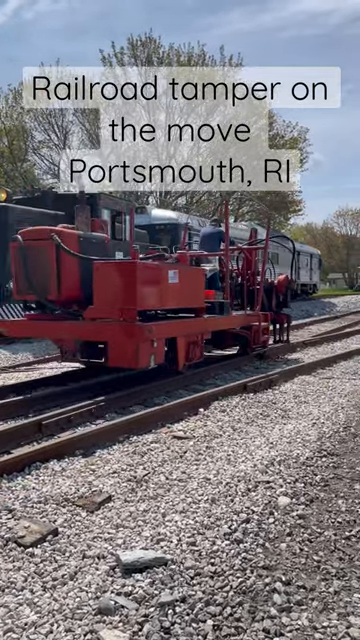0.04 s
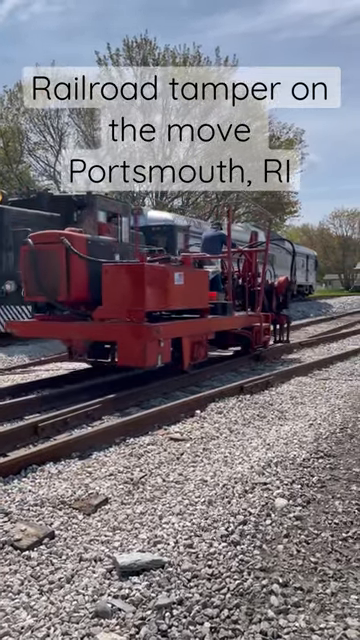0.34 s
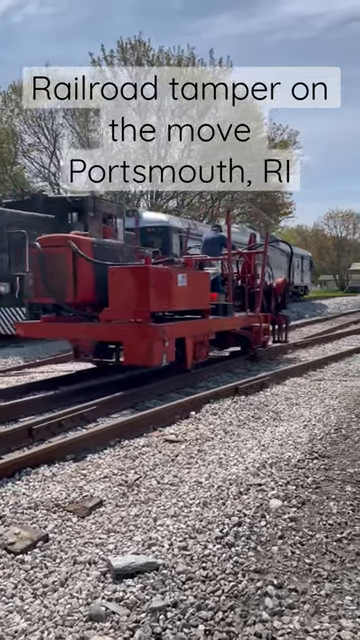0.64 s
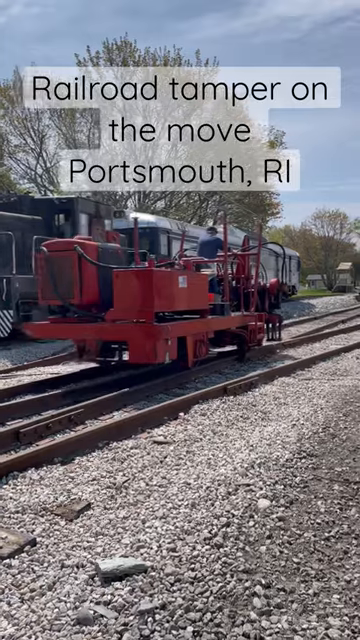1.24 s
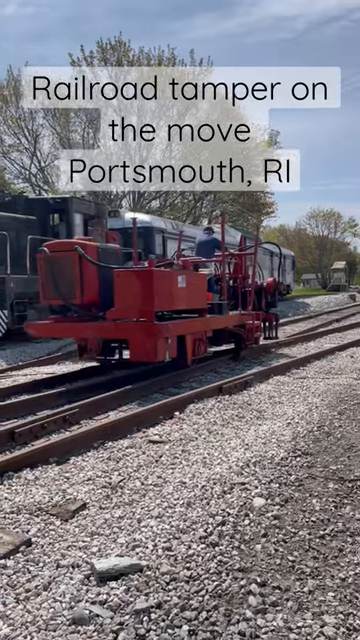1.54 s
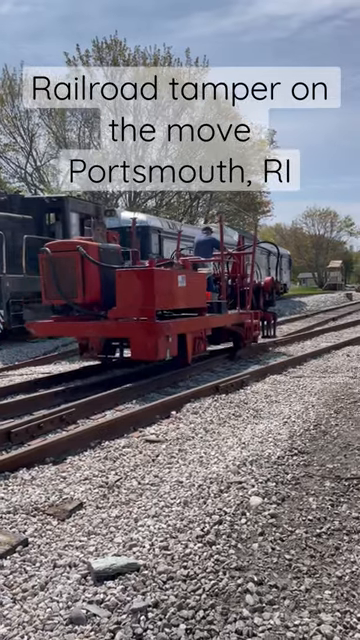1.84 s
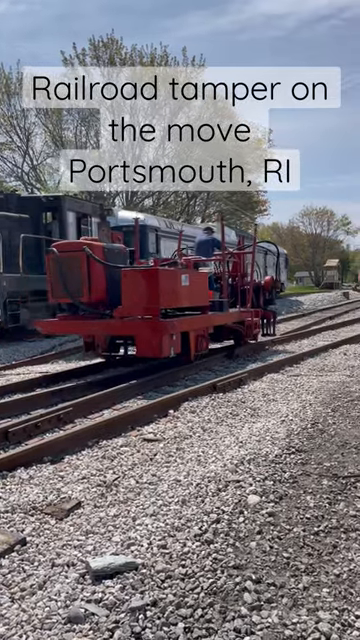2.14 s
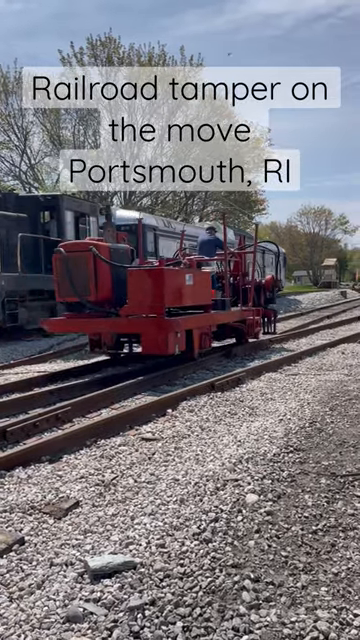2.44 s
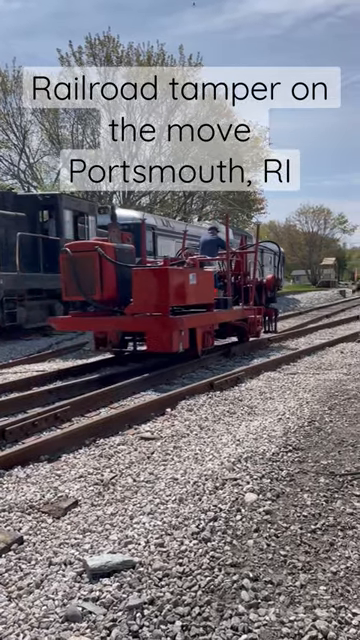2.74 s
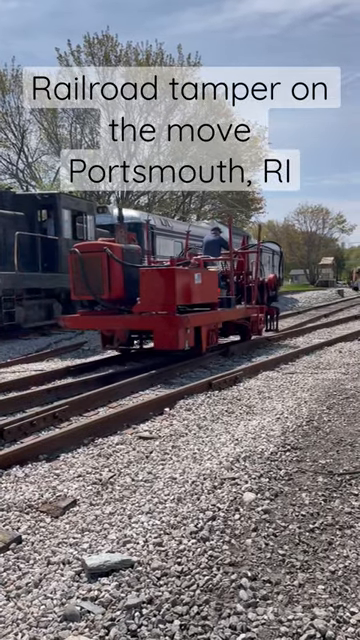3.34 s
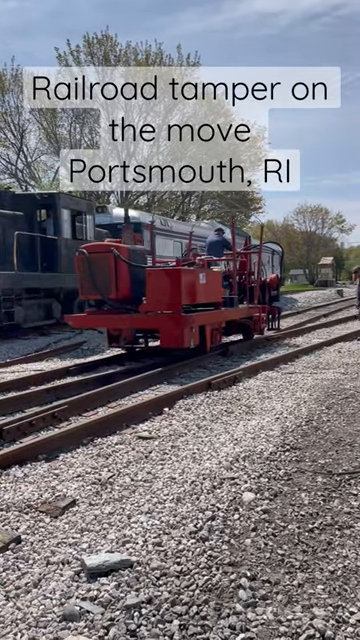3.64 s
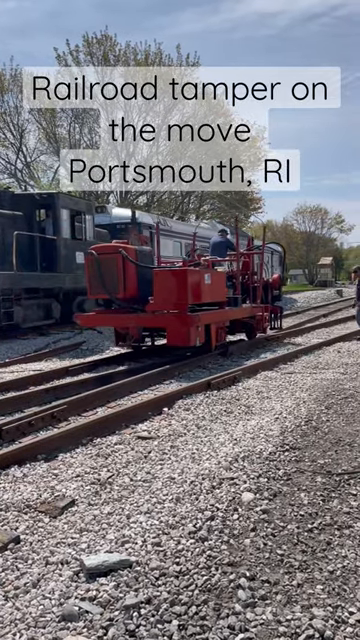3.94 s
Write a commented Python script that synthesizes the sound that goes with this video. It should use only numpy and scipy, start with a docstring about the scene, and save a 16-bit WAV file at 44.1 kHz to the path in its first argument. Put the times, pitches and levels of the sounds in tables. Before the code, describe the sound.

A rail maintenance machine's diesel drones steadily as it rolls slowly, hissing in brief, regular spits.

```python
"""A diesel drones at high, slightly hunting revs: a track maintenance machine rolling slowly over ballast.
Its tones are orders, multiples of the crank speed. The exhaust is loudest on the twelfth, over a buzz of
other orders, clatter in every turn and a broad rush. Panels resonate as the orders sweep through them.
Short hissing spits, probably compressed air, come every half second or so; a wheel squeals thinly twice,
the frame clanks once, and a big diesel seems to idle behind."""
import sys
import numpy as np
from scipy import signal
from scipy.fft import rfft, irfft
from scipy.io import wavfile
from scipy.ndimage import uniform_filter1d

SR = 44100
rng = np.random.default_rng(int(sys.argv[2]) if len(sys.argv) > 2 else 0)


def to_wav(s):
    """Save 16-bit WAV."""
    ch = np.atleast_2d(s).T  # columns
    pcm = np.round(np.clip(ch, -1, 1) * 32767)  # PCM
    wavfile.write(sys.argv[1], SR, pcm.astype(np.int16))


N = 176400
T = np.arange(N) / SR
HZ = np.fft.rfftfreq(N, 1 / SR)


def amp(db):
    """Amplitude grows tenfold for every 20 dB."""
    return 10 ** (np.asarray(db) / 20)


def unit_rms(x):
    """Normalisation to a mean power of one."""
    return x / np.sqrt(np.mean(abs(x) ** 2) + 1e-20)


def curve(points):
    """Linear interpolation of (time, value) points at every sample."""
    return np.interp(T, *np.transpose(points))


def spectrum_at(points, hz):
    """Interpolation of (frequency, value) points on a logarithmic frequency axis."""
    f, value = np.transpose(points)
    return np.interp(np.log(hz + 1), np.log(f + 1), value)


def drift(rate_hz):
    """Low-passed noise: a random movement of unit size, up to about the given rate."""
    count, control_hz = 2048, 256
    lowpass = np.exp(-(np.fft.rfftfreq(count, 1 / control_hz) / rate_hz) ** 2)
    slow = unit_rms(irfft(rfft(rng.standard_normal(count)) * lowpass))
    return np.interp(T, np.arange(count) / control_hz, slow)


def partial(turns, order, wander, rate_hz):
    """Interference with shifting reflections makes a tone wander in amplitude and phase."""
    angle = 2 * np.pi * (order * turns + rng.random())
    in_phase = (1 + wander * drift(rate_hz)) * np.cos(angle)
    quadrature = wander * drift(rate_hz) * np.sin(angle)
    return (in_phase + quadrature) / np.sqrt(.5 + wander ** 2)


def ringing(modes, age):
    """Free vibration: each mode is an exponentially damped sinusoid."""
    return sum(amp(db - 60 * age / t60) * np.sin(2 * np.pi * hz * age) for hz, db, t60 in modes)


def resonance_db(resonances, hz):
    """Each resonance lifts the frequencies near its centre in a bell-shaped peak."""
    return sum(db / (1 + (2 * (hz - centre) / width) ** 2) for centre, width, db in resonances)


# Each row: frequency in Hz, correlation between the two microphone ports from 0 to 1.
COHERENCE = [(60, .998), (300, .985), (750, .85), (1300, .95), (1800, .985), (2400, .88), (3400, .62),
             (4500, .72), (5500, .85), (6300, .75), (7300, .98), (8200, .98), (9400, .7), (10400, .98),
             (11700, .98), (12600, .6), (14200, .97), (15800, .65)]


def noise(spectrum, envelope):
    """Partial coherence: coloured noise has a part common to both ports and a part in antiphase."""
    common, opposed = rfft(rng.standard_normal((2, N)) * envelope)
    coherence = np.clip(spectrum_at(COHERENCE, HZ), -1, 1)
    mid = common * np.sqrt((1 + coherence) / 2)
    side = opposed * np.sqrt((1 - coherence) / 2)
    colour = amp(spectrum_at(spectrum, HZ))
    return irfft(np.array([mid + side, mid - side]) * colour, N) * np.sqrt(SR / 2)


# Each row: frequency in Hz, level in dB.
IDLE_TONES = [(54.8, -58), (69.3, -40), (73.1, -39.5), (78.3, -42.5), (85.3, -50), (91.3, -46), (97.6, -45),
              (103.6, -48)]


def idling_diesel():
    """Beating: closely spaced low tones add up to a lumpy rumble."""
    return sum(amp(db) * partial(hz * T, order=1, wander=0.18, rate_hz=1.9) for hz, db in IDLE_TONES)


# Each row: frequency in Hz, spectral density in dB.
RUSH_SPECTRUM = [(20, -72), (40, -73), (60, -58), (110, -62), (170, -64), (300, -69), (480, -61),
                 (750, -63.5), (1200, -67), (2000, -71.5), (2550, -71), (3200, -75), (4200, -76.5),
                 (5500, -77), (7000, -87.5), (9000, -84), (11000, -93.5), (15500, -103)]
# Each row: frequency in Hz, depth of the drifting patches in dB.
PATCH_DEPTH = [(300, 3), (2500, 3), (4500, 2.7)]
# Each row: centre in Hz, width in Hz, lift in dB.
METAL_RESONANCES = [(2509, 70, 2.5), (4170, 110, 3), (5720, 90, 2.5)]


def rush():
    """Broadband noise of fan, wheels and air drifts in patches and excites resonances in metal parts."""
    hz, _, spectrogram = signal.stft(noise(RUSH_SPECTRUM, envelope=0.99), SR, nperseg=2048)
    patches = uniform_filter1d(rng.standard_normal(spectrogram.shape[1:]), size=4, axis=0)
    patches = unit_rms(uniform_filter1d(patches, size=9, axis=1))  # smooth in frequency, then time
    gain_db = spectrum_at(PATCH_DEPTH, hz)[:, None] * patches
    gain_db += resonance_db(METAL_RESONANCES, hz)[:, None]
    return signal.istft(spectrogram * amp(gain_db), nperseg=2048)[1][:, :N]


# Each row: frequency in Hz, relative level in dB, time to fall 60 dB in seconds.
FRAME_MODES = [(510, 0, .6)]


def clank(start_s=1.3, rise_s=.02, level_db=-29):
    """Impact excitation: jolted once, the frame rings dully in one low mode."""
    age = np.maximum(T - start_s, 0)
    return amp(level_db) * np.minimum(age / rise_s, 1) * ringing(FRAME_MODES, age)


# Each row: start in seconds, length in seconds, level in dB.
WHEEL_SQUEALS = [(.61, .28, -43), (1.67, .24, -43)]


def squeals(pitch_hz=2509, fade_s=0.054):
    """Friction, probably against the rail, makes one wheel mode sing with a slightly rough tone."""
    envelope = np.zeros(N)
    for start, length, db in WHEEL_SQUEALS:
        nearest_end_s = np.minimum(T - start, start + length - T)
        envelope += amp(db) * np.clip(nearest_end_s / fade_s, 0, 1)
    return envelope * partial(pitch_hz * T, order=1, wander=.18, rate_hz=35)


# Each row: start in seconds, gain of the hiss in dB, gain of its lower body in dB.
AIR_SPITS = [(0.492, -6, -5), (1.042, -1.5, -2.5), (1.524, -11, -11), (1.902, -7.5, -6), (2.265, -3, -5),
             (2.769, -11.5, -4), (3.128, -6, -15), (3.513, -7.5, -11), (3.894, -0.5, -2.5)]
# Each row: frequency in Hz, spectral density in dB.
HISS_SPECTRUM = [(3000, -87), (5500, -70), (8000, -69.5), (11000, -71.5), (15500, -73.5)]
BODY_SPECTRUM = [(2000, -82.5), (3700, -62.5), (5000, -63), (6500, -75.5), (9000, -80)]
# A faint, longer leak. Each row: time in seconds, gain of the hiss in dB.
LEAK_GAIN = [(1.12, -51), (1.26, -20), (1.5, -22), (1.68, -46)]
# Each row: frequency in Hz, relative level in dB, time to fall 60 dB in seconds.
PIPE_MODES = [(4350, -53.5, .07), (5010, -50.5, 0.063), (5500, -53, .06)]


def spits(rise_s=0.0039, fall_s=0.0083, tail_s=0.048, tail_db=-21.5, pipe_db=-10):
    """Jet noise: each spit of air swells quickly, dies with a faint tail and rings the pipe's modes."""
    hiss, body = amp(curve(LEAK_GAIN)), np.zeros(N)
    for start, hiss_db, body_db in AIR_SPITS:
        age = np.maximum(T - start - rise_s, 0)
        fall = np.exp(-age / fall_s) + amp(tail_db) * np.exp(-age / tail_s)
        envelope = np.clip((T - start) / rise_s, 0, 1) * fall
        hiss += amp(hiss_db) * envelope
        body += amp(body_db) * envelope
    pipe_response = ringing(PIPE_MODES, T[:SR // 4])
    pipe = signal.fftconvolve(body * rng.standard_normal(N), pipe_response)[:N]
    return noise(HISS_SPECTRUM, hiss) + noise(BODY_SPECTRUM, body) + amp(pipe_db) * pipe


# Each row: crank angle as a fraction of a turn, relative level in dB.
CRANK_KNOCKS = [(0.122, -7), (0.859, -6)]
# Each row: frequency in Hz, spectral density in dB.
CLATTER_SPECTRUM = [(300, -79.5), (1000, -71.5), (2500, -83), (3300, -81.5), (4300, -82.5), (6000, -84),
                    (9000, -104), (11000, -93), (15500, -100)]


def clatter(turns, decay_turns=0.23, spread_db=2):
    """Periodic impacts: valves and injectors make noise bursts at set crank angles, uneven in strength."""
    envelope = np.zeros(N)
    for angle, db in CRANK_KNOCKS:
        age_turns = turns + 1 - angle
        strength_by_turn = amp(db + spread_db * rng.standard_normal(size=256))
        envelope += strength_by_turn[age_turns.astype(int)] * np.exp(-(age_turns % 1) / decay_turns)
    return noise(CLATTER_SPECTRUM, unit_rms(envelope))


# Each row: centre in Hz, width in Hz, lift in dB.
PANEL_RESONANCES = [(612, 12, 13), (789, 26, 6), (991, 12, 10), (1061, 8.7, 5.5), (1489, 31, 8),
                    (1505, 26, -0.5), (1859, 36, 8.5)]


def panel_gain(hz):
    """Forced vibration: a gliding order swells as it crosses a panel's natural frequency."""
    return np.interp(T, T[::200], amp(resonance_db(PANEL_RESONANCES, hz[::200])))


# Each row: frequency in Hz, level of an order there in dB.
BUZZ_SPECTRUM = [(700, -45.5), (900, -48.5), (1100, -48.5), (1300, -48.5), (1500, -50.5), (1680, -53),
                 (1880, -54.5), (2150, -57), (2330, -54.5), (2600, -56), (3000, -65.5), (4500, -68.5)]
# Each row: time in seconds, gain in dB.
BUZZ_GAIN = [(0, 0), (.45, 3), (.8, 1.5), (1.3, 0.5), (1.9, 0), (2.4, 0), (3.1, -1.5), (3.6, .5), (4, 1.5)]


def buzz(turns, speed, stereo_width=.15, wander_hz=1.4, flutter=0.05):
    """A harmonic series of high orders drives the panels and differs a little at each port."""
    out = np.zeros((2, N))
    for order in np.setdiff1d(np.arange(19, 112), [20, 25, 30]):  # these three have their own levels
        level = amp(spectrum_at(BUZZ_SPECTRUM, order * speed.mean())) * panel_gain(order * speed)
        mid = partial(turns, order, wander=0.33, rate_hz=wander_hz)
        side = stereo_width * drift(wander_hz) * np.cos(2 * np.pi * (order * turns + rng.random()))
        out += level * np.array([mid + side, mid - side])
    return out * amp(curve(BUZZ_GAIN)) * (1 + flutter * drift(rate_hz=40))


# Each row: time in seconds, level in dB.
LOW_WHINE_LEVEL = [(0, -46), (.8, -58), (1.35, -42), (1.75, -60), (2.3, -37), (3.35, -37.5), (3.75, -44),
                   (4, -35)]
HIGH_WHINE_LEVEL = [(0, -41.5), (.55, -33), (1.15, -42), (1.7, -38), (2, -41), (2.3, -34), (2.7, -38.5),
                    (3.3, -38.5), (3.6, -45), (4, -39)]


def whines(turns):
    """Slow amplitude modulation: two orders near 1 kHz swell and fade."""
    low = amp(curve(LOW_WHINE_LEVEL)) * partial(turns, order=25, wander=0.14, rate_hz=5.8)
    high = amp(curve(HIGH_WHINE_LEVEL)) * partial(turns, order=30, wander=0.14, rate_hz=7.5)
    return low + high


# Each row: time in seconds, level of the fundamental in dB.
GROWL_LEVEL = [(0.0, -41), (0.6, -30), (1.45, -34), (1.76, -42), (1.86, -31.5), (2.31, -29.5),
               (2.88, -40.5), (3.23, -31), (3.63, -28), (3.98, -50), (4.0, -44)]
# Each row: multiple of the blade tone, level in dB.
BLADE_OVERTONES = [(2, -44), (3, -48)]


def fan(turns, blades_per_turn=4.955):
    """A growl, probably the belt-driven fan's blade-passing tone, slips against the engine's orders."""
    passes = blades_per_turn * turns
    growl = amp(curve(GROWL_LEVEL)) * partial(passes, order=1, wander=0.056, rate_hz=2.0)
    return growl + sum(amp(db) * partial(passes, round(multiple), wander=1.0, rate_hz=1.7)
                       for multiple, db in BLADE_OVERTONES)


# Each row: multiple of the crank speed, level in dB.
ENGINE_ORDERS = [(2, -45.5), (4, -49.5), (7, -49.5), (8, -49.5), (14, -42), (15, -49), (16, -42.5),
                 (20, -46)]


def steady_orders(turns, speed):
    """Steadier harmonics of the crank speed, lifted wherever they meet a panel resonance."""
    out = np.zeros(N)
    for order, db in ENGINE_ORDERS:
        level = amp(db) * panel_gain(round(order) * speed)
        out += level * partial(turns, round(order), wander=0.29, rate_hz=1.9)
    return out


# Each row: time in seconds, level in dB.
BASS_LEVEL = [(0, -31.5), (.3, -35), (.75, -28.5), (1.2, -37.5), (1.7, -32), (2.1, -34), (2.5, -29),
              (3.1, -43.5), (3.45, -33.5), (4, -31)]
HUM_LEVEL = [(0, -26.5), (.5, -29.3), (.75, -29.3), (1.15, -31.3), (1.65, -30.3), (2.0, -35), (2.2, -33.7),
             (2.4, -38), (2.9, -40), (3.2, -37), (3.5, -30.3), (3.75, -31.5), (4, -27)]
NASAL_LEVEL = [(0, -26), (.35, -23.5), (.7, -34), (1.0, -31), (1.35, -28.5), (1.7, -37), (1.92, -31.5),
               (2.4, -36.5), (2.8, -40.5), (3.7, -37), (3.95, -27)]
NASAL_NEIGHBOUR_LEVEL = [(0, -28), (.45, -27.5), (.75, -48), (1.9, -40), (2.7, -51.5), (3.3, -45),
                         (3.8, -32.5), (4, -31)]


def exhaust(turns, fifth_db=-3.5):
    """Periodic exhaust flow radiates harmonics: a bass, a hum with its fifth, and a nasal pair."""
    bass = amp(curve(BASS_LEVEL)) * partial(turns, order=3, wander=0.29, rate_hz=1.9)
    hum = partial(turns, order=6, wander=0.024, rate_hz=10.0)
    fifth = amp(fifth_db) * partial(turns, order=9, wander=0.14, rate_hz=7.9)
    nasal = amp(curve(NASAL_LEVEL)) * partial(turns, order=18, wander=0.16, rate_hz=6)
    neighbour = amp(curve(NASAL_NEIGHBOUR_LEVEL)) * partial(turns, order=17, wander=0.18, rate_hz=2.2)
    return bass + amp(curve(HUM_LEVEL)) * (hum + fifth) + nasal + neighbour


# Each row: time in seconds, level in dB.
DRONE_LEVEL = [(0.0, -20.5), (0.38, -19.5), (0.62, -15), (1.22, -18.5), (1.48, -21), (1.63, -20),
               (1.76, -23.5), (1.95, -18.5), (2.07, -20.5), (2.53, -17.5), (3.12, -18), (3.32, -17.5),
               (3.43, -23), (3.71, -24), (3.95, -21.5), (4.0, -23)]
# Each row: time in seconds, left minus right in dB on top of the ports' own balance.
DRONE_PAN = [(0, -0.29), (.7, -0.36), (1.25, 1.3), (1.8, -0.59), (2.3, -.7), (4, -.5)]


def drone(turns, order=12, throb_db=-31.5):
    """Amplitude modulation makes the loudest exhaust harmonic throb once a turn."""
    envelope = amp(curve(DRONE_LEVEL)) + amp(throb_db) * np.cos(2 * np.pi * turns)
    lean = amp(curve(DRONE_PAN) / 2)
    return np.array([lean, 1 / lean]) * np.sqrt(2) * envelope * np.cos(2 * np.pi * order * turns)


# Each row: time in seconds, crank speed in turns per second.
CRANK_SPEED = [(0, 37.65), (0.28, 37.75), (0.6, 38.89), (0.85, 39.36), (1.15, 39.58), (1.65, 39.54),
               (1.83, 38.52), (2.03, 37.87), (2.14, 37.77), (2.35, 38.66), (2.6, 39.2), (3.1, 39.76),
               (3.2, 39.63), (3.42, 38.3), (3.62, 37.62), (4, 37.37)]
# Each row: time in seconds, gain of the rush, clatter and steady orders in dB.
MACHINE_BED_GAIN = [(0, 0.5), (.5, 0), (1.1, 0), (1.7, -0.5), (2.25, -0.7), (2.8, -1), (3.3, -2),
                    (3.7, -1.5), (4, -1.5)]


def scene():
    """Superposition: the engine's layers share one crank phase; the other sources run independently."""
    speed = curve(CRANK_SPEED)
    turns = np.cumsum(speed) / SR
    bed_gain = amp(curve(MACHINE_BED_GAIN))
    tones = drone(turns) + exhaust(turns) + bed_gain * steady_orders(turns, speed)
    tones += fan(turns) + whines(turns) + buzz(turns, speed)
    return tones + bed_gain * (clatter(turns) + rush()) + spits() + squeals() + clank() + idling_diesel()


# Each row: frequency in Hz, left minus right in dB.
PORT_BALANCE = [(80, 0), (250, 1.5), (470, 2), (750, 0.8), (980, -2.5), (1200, -3), (1800, -0.3),
                (2300, -1.5), (3000, -3), (4300, 2.5), (6000, 1.5)]
# Each row: frequency in Hz, phase lead of the left port in radians.
PORT_PHASE = [(100, 0), (230, -.16), (470, -.36), (780, -.8), (1130, -.4), (1380, -.03), (1950, 0),
              (2400, .8), (3400, 1.05), (4300, .45), (4900, -.25), (5600, .2), (7300, 3.05), (8200, 3.2),
              (9200, 4), (10200, 6.1), (11700, 6.3), (12500, 7.0), (13500, 9.2), (15500, 9.9)]


def record(dry, cutoff_hz=15880):
    """Level and phase differences between two ports give the stereo image; a low-pass limits the band."""
    left = amp(spectrum_at(PORT_BALANCE, HZ) / 2) * np.exp(.5j * spectrum_at(PORT_PHASE, HZ))
    ports = irfft(rfft(dry) * np.array([left, 1 / left]), N)
    lowpass = signal.firwin(511, cutoff_hz, window=("kaiser", 9), fs=SR)
    return signal.oaconvolve(ports, lowpass[None], "same")


dry = scene()
out = record(dry)
to_wav(out)
```